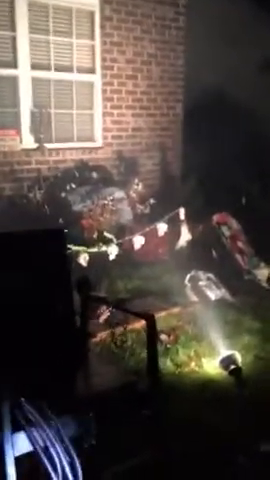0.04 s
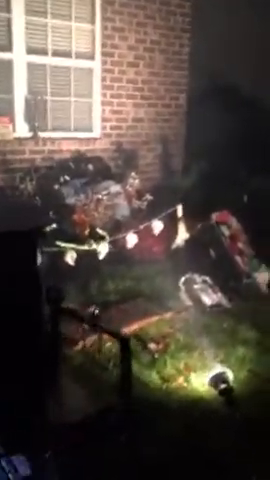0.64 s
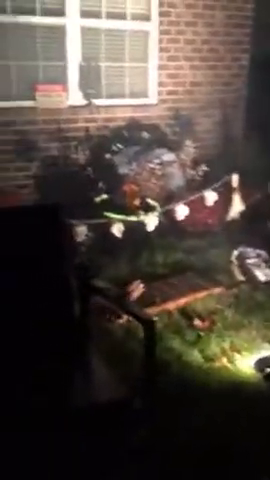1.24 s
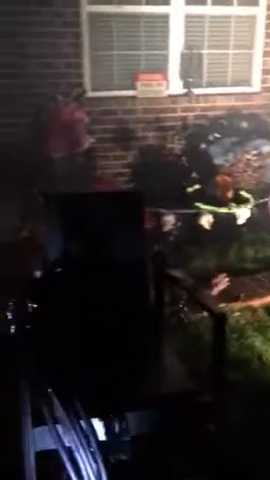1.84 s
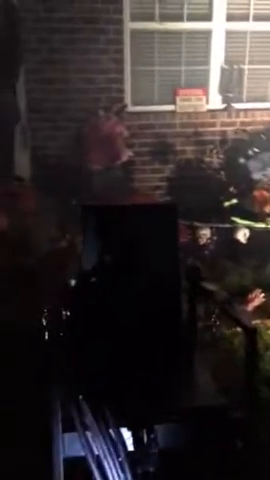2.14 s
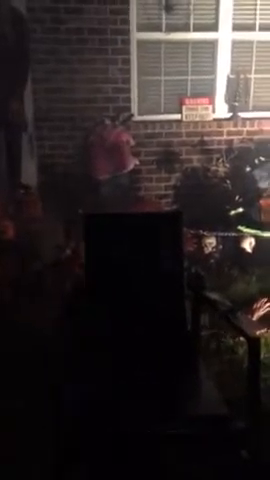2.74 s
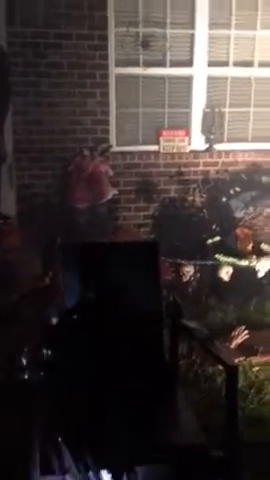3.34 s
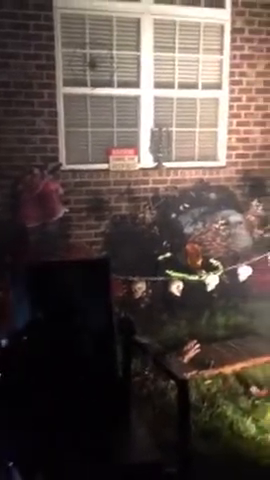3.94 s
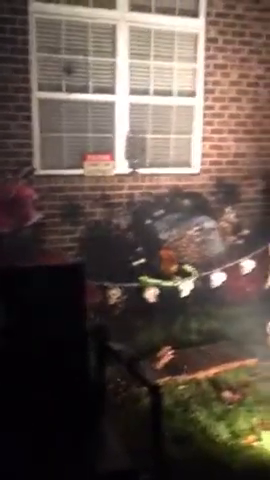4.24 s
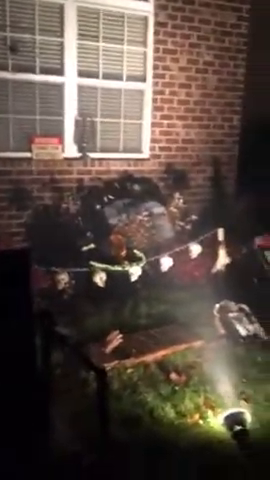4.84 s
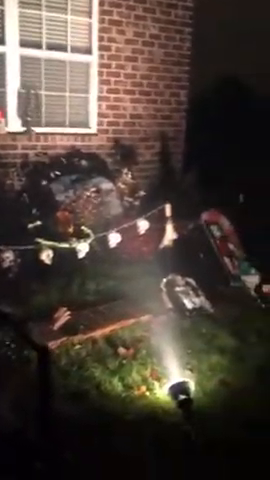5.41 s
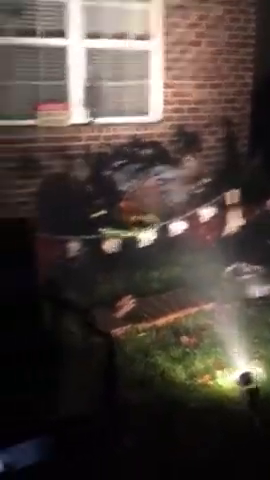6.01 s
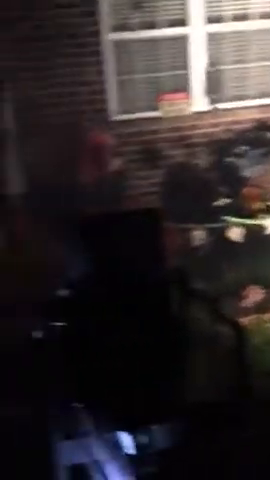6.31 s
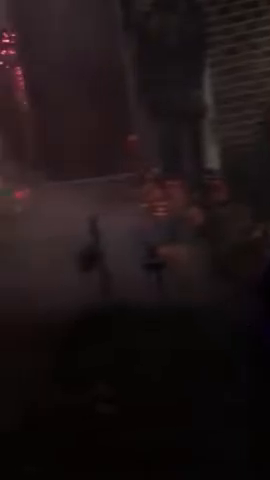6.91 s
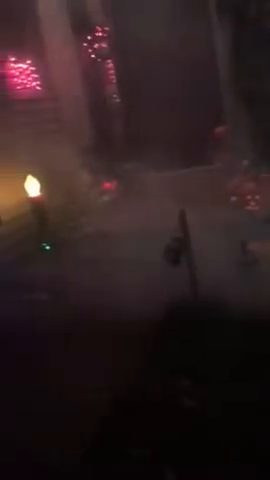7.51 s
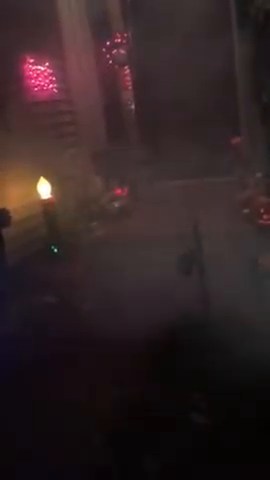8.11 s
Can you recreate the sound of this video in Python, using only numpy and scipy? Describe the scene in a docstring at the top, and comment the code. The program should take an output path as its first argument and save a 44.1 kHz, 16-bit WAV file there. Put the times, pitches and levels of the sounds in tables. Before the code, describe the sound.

A fog machine on a porch at night gives a bright, high hiss that swells and drops away again and again, a little faster than once a second. In the lulls the nozzle spits tiny droplets and a faint pump hum comes up. Early on, air puffs against the hand-held microphone and a hand knocks softly on it. A low outdoor rumble lies underneath throughout.

```python
"""A fog machine hisses in slow surges on a porch at night, heard by a hand-held camera panning the yard.
Between surges its hot nozzle spits droplets and the pump hum comes up.
A close reflection carves moving notches into the hiss; the porch adds a short tail.
A low outdoor rumble lies underneath, with a few faint, far tones.
Early on, air buffets the microphone and the hand knocks softly on the camera."""
import sys
import numpy as np
from scipy import signal
from scipy.fft import rfft, irfft
from scipy.io import wavfile
from scipy.ndimage import uniform_filter1d

SR = 44100
rng = np.random.default_rng(int(sys.argv[2]) if len(sys.argv) > 2 else 0)


def generate_wav(signal):
    """Clip the signal to [-1, 1] and save it as 16-bit WAV at the path in sys.argv[1]."""
    frames = np.transpose(np.atleast_2d(signal))
    scaled = np.clip(frames, -1, 1) * 32767
    pcm = np.round(scaled).astype(np.int16)
    wavfile.write(sys.argv[1], SR, pcm)


N = 359856
TIME_S = np.arange(N) / SR
FREQ_HZ = np.fft.rfftfreq(N, 1 / SR)
BAND_EDGE_HZ = 17200


def gain_of(db):
    """Decibels to amplitude."""
    return 10 ** (np.asarray(db) / 20)


def unit_rms(x):
    """Scales to rms 1."""
    return x / np.sqrt(np.mean(x ** 2) + 1e-20)


def at_time(points, time_s):
    """Interpolates a table over time."""
    return np.interp(time_s, *np.transpose(points))


def at_hz(points, hz):
    """Interpolates a table over log frequency."""
    freq_hz, value = np.transpose(points)
    return np.interp(np.log(hz + 1), np.log(freq_hz + 1), value)


def coloured(x, spectrum):
    """Filters by a dB table, at unit power gain for white noise."""
    return irfft(rfft(x) * unit_rms(gain_of(at_hz(spectrum, FREQ_HZ))), N)


def wander(rate_hz):
    """Smooth random motion of rms 1, strongest near rate_hz."""
    white = rfft(rng.standard_normal(N))
    return unit_rms(irfft(white * FREQ_HZ / rate_hz * np.exp(-FREQ_HZ / rate_hz), N))


def stft(x, size=512):
    """Short-time spectra: frequency column, frame times, bins."""
    hz, frame_s, bins = signal.stft(x, SR, nperseg=size)
    return hz[:, None], frame_s, bins


def istft(bins):
    """Short-time spectra to sound."""
    return signal.istft(bins, SR)[1][:N]


# Pressure cycles: outbreak_s, end_s, top_db, jump_db, lull_db
SURGE_CYCLES = [(0.104, .289, -23.5, 5.5, -42), (0.69, 0.884, -25, 4.5, -42), (1.182, 1.487, -26, 5, -39.5),
                (1.927, 2.12, -24, 3.5, -39.5), (2.465, 2.771, -25, 5, -38), (3.12, 3.467, -25.5, 5, -38.5),
                (3.904, 4.171, -25, 4.5, -39), (4.56, 4.933, -26.5, 6, -40),
                (5.336, 5.707, -26.5, 6.5, -42), (6.096, 6.491, -25.8, 6.5, -40.5),
                (6.913, 7.289, -25.5, 5, -41), (7.706, 8.12, -25.5, 5.5, -39)]


def pressure_db(time_s, full_db=-24, outbreak_rise_s=0.04, collapse_s=0.125):
    """Jet drive relative to full: builds from a lull, breaks out, holds, collapses."""
    level_db = np.zeros(len(time_s))
    start_s = 2 * SURGE_CYCLES[0][1] - SURGE_CYCLES[1][1]  # first cycle already under way
    floor_db = SURGE_CYCLES[0][4]
    for outbreak_s, end_s, top_db, jump_db, lull_db in SURGE_CYCLES:
        t = time_s[time_s >= start_s]
        build = 1 - np.clip((outbreak_s - t) / (outbreak_s - start_s), 0, 1) ** 1.43
        surge = 1 - np.exp(-np.maximum(t - outbreak_s, 0) / outbreak_rise_s)
        collapse = np.clip(1 - (end_s - t) / collapse_s, 0, 1) ** 1.93
        rising_db = floor_db + (top_db - jump_db - floor_db) * build + jump_db * surge
        level_db[time_s >= start_s] = rising_db + (lull_db - rising_db) * collapse
        start_s, floor_db = end_s, lull_db
    return level_db - full_db


def pressure_sag(range_db=15):
    """0 at full pressure, 1 with the jet collapsed."""
    coarse_s = TIME_S[::64]
    return np.interp(TIME_S, coarse_s, np.clip(-pressure_db(coarse_s) / range_db, 0, 1))


# Hiss at full pressure: freq_hz, relative_db
HISS_SPECTRUM = [(200, -41), (700, -31.5), (1200, -27), (1550, -25.5), (1950, -17), (2800, -21.5),
                 (3400, -16.5), (4800, -17), (5700, -11), (6700, -8.5), (8000, -10.5), (11500, -5),
                 (14000, -1), (17000, 1.5)]
# Response of the hiss to pressure: freq_hz, slope_db_per_db
PRESSURE_SLOPE = [(900, 0.93), (2200, 0.94), (4500, 0.95), (7000, 1), (9500, 1), (15000, 1.1)]
# Nozzle and housing resonances: centre_hz, half_width_hz, relative_boost_db
NOZZLE_MODES = [(977, 92, 6), (2300, 280, 4.5), (2740, 59, 4.5), (3060, 55, 8.5), (3480, 44, 4),
                (4240, 120, 4.5), (5280, 180, 2.5), (6970, 140, 0.5)]
# Depth of resonances and reflection at the microphone: time_s, factor
COLOUR_DEPTH = [(0, 0.5), (1, 0.89), (2, 0.97), (4.3, 1.15), (5.5, 1.2), (6.5, 1.05), (8.1, 0.92)]
# Microphone direction, positive to the yard, negative to the porch: time_s, aim
MIC_AIM = [(0, 1), (1.2, 0.54), (2.2, -0.14), (3.4, 0.01), (4.3, 0.35), (5.2, 0.56), (6, 0.59), (6.7, -.6),
           (8.1, -1.65)]
# Colour change with direction: freq_hz, db_per_aim
AIM_COLOUR = [(1500, 0.5), (2400, 1), (4000, 0.5), (5300, 1), (6500, 1.7), (9000, -0.9), (11500, -0.5),
              (13600, -1), (16000, 2.5), (17000, 2.5)]


def jet(level_db=-23, flutter_db=0.67, flutter_hz=110, sway_db=0.36, sway_hz=7,
        sputter_db=1.7, sputter_hz=14):
    """Turbulent vapour rings the nozzle: brighter as pressure builds, unsteady as it sags."""
    hz, frame_s, noise = stft(rng.standard_normal(N))
    modes_db = sum(db * np.exp(-((hz - centre_hz) / width_hz) ** 2)
                   for centre_hz, width_hz, db in NOZZLE_MODES)
    aim_db = at_time(MIC_AIM, frame_s) * at_hz(AIM_COLOUR, hz)
    colour = gain_of(at_hz(HISS_SPECTRUM, hz) + at_time(COLOUR_DEPTH, frame_s) * modes_db + aim_db)
    colour /= np.sqrt(np.mean(colour[hz[:, 0] < BAND_EDGE_HZ] ** 2, axis=0))
    drive = gain_of(at_hz(PRESSURE_SLOPE, hz) * pressure_db(frame_s))
    unsteady_db = flutter_db * wander(flutter_hz) + sway_db * wander(sway_hz)
    unsteady_db += sputter_db * pressure_sag() * wander(sputter_hz)
    return istft(noise * colour * drive) * gain_of(level_db + unsteady_db)


# Loudest droplet bursts: start_s, relative_db
LOUD_SPITS = [(.359, -32.5), (1.544, -32), (1.586, -42), (2.801, -32), (2.85, -34), (2.884, -34),
              (3.449, -33.5), (3.53, -36), (3.584, -33), (4.198, -34.5), (4.266, -37), (4.326, -35),
              (5.014, -34), (5.148, -35), (5.763, -34)]
# Droplet fizz: freq_hz, relative_db
FIZZ_SPECTRUM = [(800, -26), (2200, -15), (3300, -2), (4300, -7), (7000, 6), (8500, 3), (17000, -19)]


def spits(gain_db=2, fizz_db=-2.5, rate_hz=62, jitter=0.11, spread_db=2, rise_s=0.00038,
          dry_db=-55, wet_db=-40, wetting_s=1.7):
    """Droplets flash to vapour in the hot nozzle; the low-pressure sputter grows as it gets wet."""
    count = np.cumsum(rate_hz * np.exp(jitter * wander(30))) / SR
    ticks = np.diff(np.floor(count), prepend=0)
    sputter_db = np.interp(TIME_S, [0, wetting_s], [dry_db, wet_db])
    bursts = ticks * pressure_sag() * gain_of(sputter_db + spread_db * rng.standard_normal(N))
    for start_s, db in LOUD_SPITS:
        bursts[round(start_s * SR)] += gain_of(db)
    t = TIME_S[:SR // 150]
    envelope = t / rise_s * np.exp(1 - t / rise_s)
    pitches_hz = np.linspace(4600, 7000, num=5)  # one per droplet size
    size = rng.integers(0, len(pitches_hz), N)
    pops = sum(signal.oaconvolve(bursts * (size == k), envelope * np.sin(2 * np.pi * hz * t))[:N]
               for k, hz in enumerate(pitches_hz))
    fizz_envelope = signal.oaconvolve(bursts, np.sqrt(envelope))[:N]
    fizz = coloured(fizz_envelope * rng.standard_normal(N), FIZZ_SPECTRUM)
    return gain_of(gain_db) * (pops + gain_of(fizz_db) * fizz)


# Strength of the close reflection: freq_hz, relative_gain
REFLECTION_GAIN = [(1000, .22), (3400, .22), (6000, .35), (8000, .48), (10500, .48), (15000, .41)]
# Its extra travel time: time_s, lag_ms
REFLECTION_LAG = [(0, .466), (1.1, .446), (2.2, 0.44), (3.2, 0.43), (4.6, 0.45), (5.4, .422), (6.1, 0.429),
                  (6.8, .436), (8.15, 0.45)]


def close_reflection(x):
    """A nearby surface adds a late copy: comb notches that slide as the camera moves."""
    hz, frame_s, bins = stft(x)
    gain = at_hz(REFLECTION_GAIN, hz) * np.sqrt(at_time(COLOUR_DEPTH, frame_s))
    lag_s = at_time(REFLECTION_LAG, frame_s) / 1000
    comb = 1 + gain * np.exp(-2j * np.pi * hz * lag_s)
    return istft(bins * comb / np.sqrt(1 + gain ** 2))


def porch(x, wet_db=-12, t60_s=0.051, predelay_s=0.003, taps_per_s=3000, cutoff_hz=12000):
    """Wall, floor and railing scatter a short, sparse, dull tail that changes as the camera moves."""
    t = TIME_S[:SR // 5]
    centres_s, spacing_s = np.linspace(0, TIME_S[-1], num=4, retstep=True)
    dull = irfft(rfft(x) / (1 + (FREQ_HZ / cutoff_hz) ** 4), N)
    wet = np.zeros(N)
    for centre_s in centres_s:
        taps = rng.standard_normal(len(t)) * (rng.random(len(t)) < taps_per_s / SR)
        tail = taps * (t > predelay_s) * gain_of(-60 * t / t60_s)
        crossfade = np.sqrt(np.clip(1 - abs(TIME_S - centre_s) / spacing_s, 0, 1))
        wet += crossfade * signal.oaconvolve(dull, tail / np.linalg.norm(tail))[:N]
    return x + gain_of(wet_db) * wet


# Pump hum partials: pitch_hz, relative_db
PUMP_PARTIALS = [(120, -71), (240, -65.5)]


def pump(swing_db=14, waver_rad=0.25):
    """Mains hum swells as the pump refills the heater between surges."""
    load = uniform_filter1d(pressure_sag(), size=6000) ** 2
    hum = sum(gain_of(db) * np.sin(2 * np.pi * hz * TIME_S + waver_rad * wander(5.5))
              for hz, db in PUMP_PARTIALS)
    return np.sqrt(2) * hum * gain_of(swing_db * (load - 0.5))


# Outdoor rumble: freq_hz, relative_db
RUMBLE_SPECTRUM = [(20, -20), (35, -11.5), (55, 3.5), (80, 0.5), (120, -4.5), (190, -9.5), (300, -14.5),
                   (420, -17), (650, -24.5), (1500, -23.5), (5000, -24.5)]
# Its slow trend: time_s, level_db
RUMBLE_TREND = [(0, -48), (1.3, -49), (1.55, -52), (2.1, -48), (3.1, -50.5), (3.35, -53), (3.7, -50),
                (8.1, -50.5)]


def rumble(swell_db=1.62, gust_db=1.0, gust_corner_hz=90):
    """Low wash of night air and far traffic; the deepest part comes in small gusts."""
    hz, frame_s, bins = stft(coloured(rng.standard_normal(N), RUMBLE_SPECTRUM), size=2048)
    gusts_db = gust_db * np.interp(frame_s, TIME_S, wander(2)) / (1 + (hz / gust_corner_hz) ** 2)
    level_db = at_time(RUMBLE_TREND, TIME_S) + swell_db * wander(4)
    return istft(bins * gain_of(gusts_db)) * gain_of(level_db)


# Air puffs on the microphone: start_s, length_s, relative_db
AIR_PUFFS = [(0.291, 0.081, -39), (0.425, 0.052, -40), (0.523, 0.066, -33), (0.604, 0.044, -39.5),
             (0.669, 0.047, -44.5), (0.805, 0.032, -42), (1.307, 0.059, -40), (1.37, 0.034, -42),
             (2.112, 0.032, -43), (2.197, 0.091, -36), (3.197, 0.032, -46)]


def buffets(gain_db=2, bass_cut_hz=44, mid_width_hz=109, mid_db=-40, db_per_octave=16):
    """Swells of low turbulence, wider in band when stronger; the microphone passes no deep bass."""
    out, size = np.zeros(N + SR), 16384
    t = (np.arange(size) - size // 2) / SR
    hz = np.fft.rfftfreq(size, 1 / SR)
    highpass = (hz / bass_cut_hz) ** 4 / np.sqrt(1 + (hz / bass_cut_hz) ** 8)
    for start_s, length_s, db in AIR_PUFFS:
        swell = np.exp(-0.5 * (t / (0.31 * length_s)) ** 2)
        width_hz = mid_width_hz * 2 ** ((db - mid_db) / db_per_octave)
        eddies = irfft(rfft(rng.standard_normal(size)) / (1 + (hz / width_hz) ** 4))
        puff = unit_rms(irfft(rfft(swell * eddies) * highpass))
        offset = round((start_s + length_s / 2) * SR)
        out[offset:offset + size] += gain_of(db + gain_db) * puff * np.sqrt(np.mean(swell ** 2))
    return out[size // 2:][:N]


def tone_pulse(peak_s, level_db, pitch_hz, sigma_s):
    """Sine under a Gaussian envelope."""
    t = TIME_S - peak_s
    envelope = np.exp(-0.5 * np.minimum((t / sigma_s) ** 2, 100))
    return gain_of(level_db) * envelope * np.sin(2 * np.pi * pitch_hz * t)


# Handling bumps: peak_s, level_db, pitch_hz
HAND_KNOCKS = [(.341, -34, 190), (0.545, -37, 300), (0.567, -41, 258), (0.815, -37, 190), (1.324, -31, 200),
               (1.565, -39, 160), (2.253, -30.5, 210)]


def knocks(sigma_cycles=0.24):
    """The hand bumps the camera: about one dull cycle, no ring."""
    return sum(tone_pulse(peak_s, db, hz, sigma_cycles / hz) for peak_s, db, hz in HAND_KNOCKS)


# Distant tones: peak_s, relative_db, pitch_hz, sigma_s
DISTANT_TONES = [(1.645, -62, 317, .04), (1.719, -65, 450, 0.031), (2.344, -64, 315, .06),
                 (4.413, -61.5, 310, 0.062), (5.13, -67.5, 361, 0.084), (7.623, -67.5, 446, 0.11)]


def far_tones(gain_db=3):
    """Brief, faint tones swell and fade above the rumble."""
    return sum(tone_pulse(peak_s, db + gain_db, hz, sigma_s)
               for peak_s, db, hz, sigma_s in DISTANT_TONES)


def scene():
    """The machine on its porch with the night around it, mono."""
    machine = porch(close_reflection(jet() + spits())) + pump()
    return (machine + buffets() + knocks() + rumble() + far_tones())[None]


def record(dry):
    """Steep low-pass at the camera's band edge."""
    lowpass = signal.firwin(511, BAND_EDGE_HZ, window=("kaiser", 9), fs=SR)
    return signal.oaconvolve(dry, lowpass[None], "same")


dry = scene()
out = record(dry)
generate_wav(out)
```